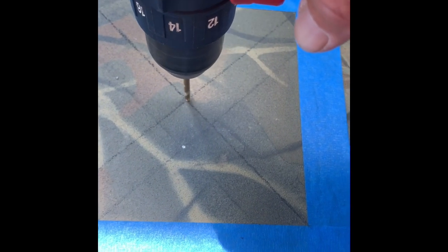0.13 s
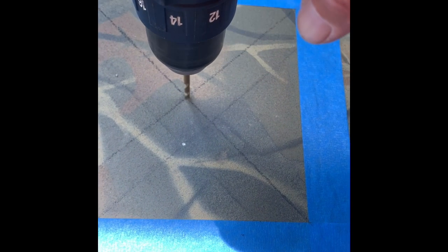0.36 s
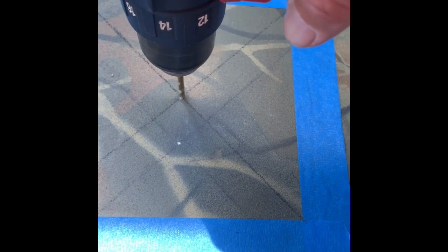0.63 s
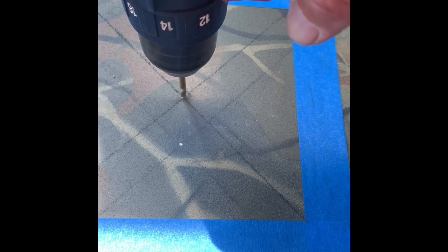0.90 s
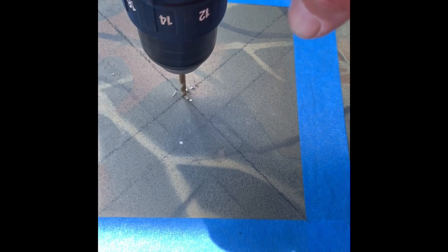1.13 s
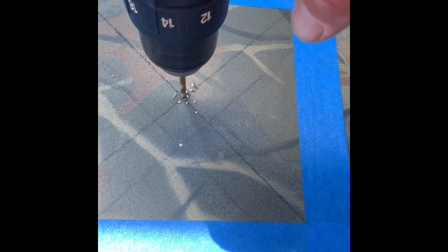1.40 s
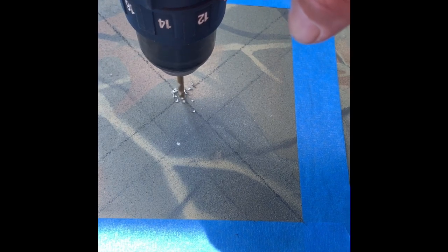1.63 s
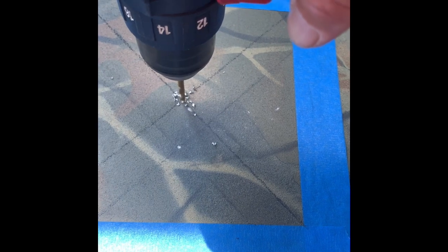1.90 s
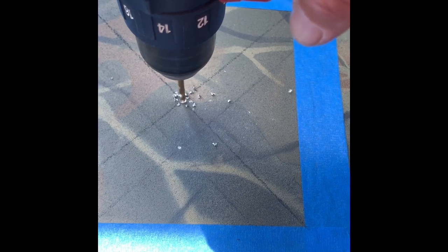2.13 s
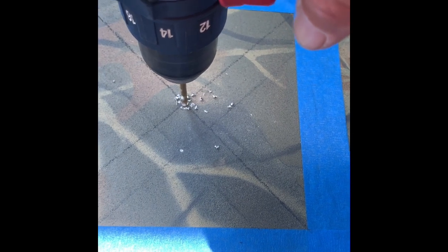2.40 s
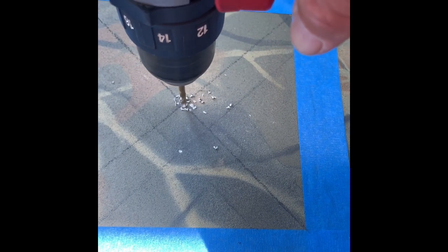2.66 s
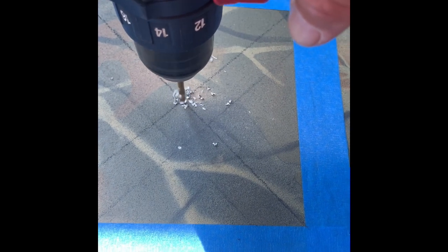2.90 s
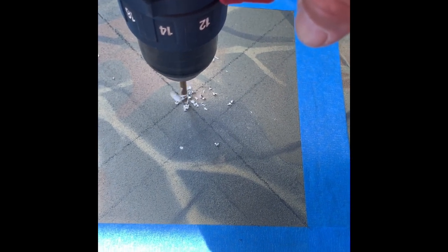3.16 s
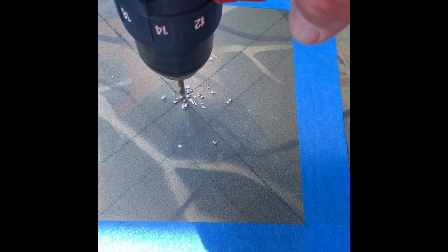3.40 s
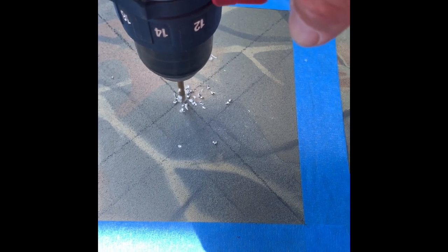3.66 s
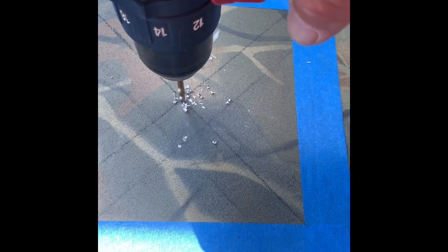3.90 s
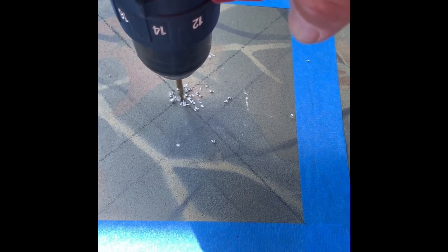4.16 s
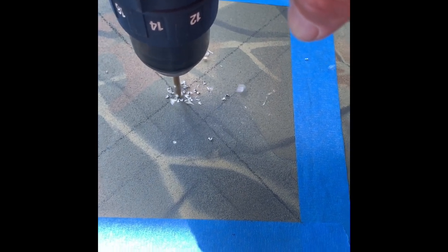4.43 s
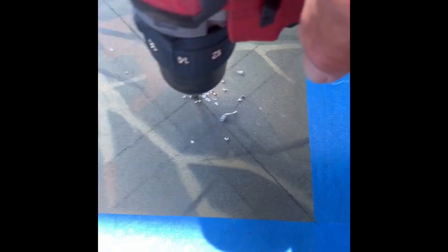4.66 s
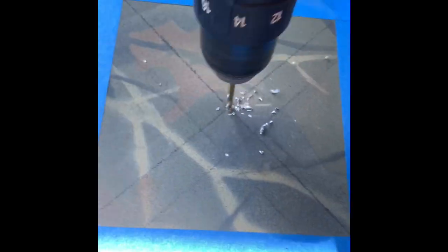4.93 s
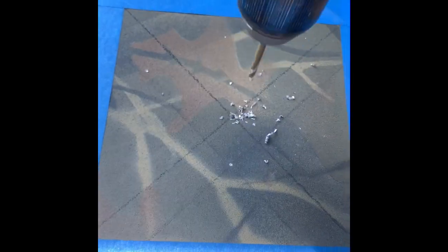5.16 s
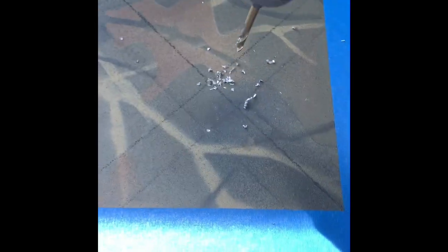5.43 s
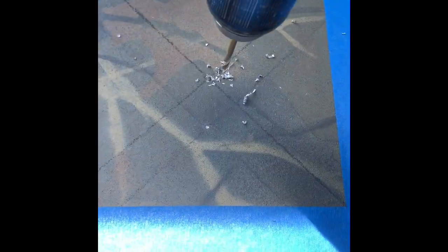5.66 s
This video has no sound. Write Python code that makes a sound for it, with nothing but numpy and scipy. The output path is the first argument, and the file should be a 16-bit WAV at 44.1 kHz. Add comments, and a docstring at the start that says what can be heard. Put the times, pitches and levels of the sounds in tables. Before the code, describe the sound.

Close outdoor drilling of a metal deck: whistling motor whirr, gritty steady cut, thud and high whine on breakthrough, abrupt stop, then only wind.

```python
"""A slow drill whirr in a light wind runs up in two steps, cuts a small hole in an aluminium deck,
races as the bit breaks through and brakes with a shriek and knocks to a stop, leaving wind and hush.
Motor and gears are near sines locked to a modelled speed; chopped current whistles in mirrored pairs.
Deck, grind, housing and fan are shaped noises; knocks are decaying tones behind noisy cracks.
Wind is lumpy low noise at a close pair of microphone ports, over a faint open-air hush."""
import sys
import numpy as np
from scipy import signal
from scipy.fft import rfft, irfft, next_fast_len
from scipy.io import wavfile

SR = 44100
rng = np.random.default_rng(int(sys.argv[2]) if len(sys.argv) > 2 else 0)


def to_wav(s):
    """Save 16-bit WAV."""
    ch = np.atleast_2d(s).T  # columns
    pcm = np.round(np.clip(ch, -1, 1) * 32767)  # PCM
    wavfile.write(sys.argv[1], SR, pcm.astype(np.int16))


N = 255780
HZ = np.arange(N // 2 + 1) * SR / N + 1  # bin frequencies, kept off zero for the log

# Motor speed, as commutation rate: (start [s], goal [Hz], time constant [s], goal drift [Hz/s])
SPEED_STAGES = [(0, 283, .05, 0), (.066, 592, .048, 0), (.14, 600.5, .075, -8), (.999, 910, 0.044, 0),
                (1.061, 916, 0.08, -0.5), (1.8, 913, .06, -15), (2.45, 897.5, 0.063, -13),
                (3.3, 887, .05, 22), (3.541, 882, 0.031, 0), (3.64, 890, .05, -28),
                (4.446, 1054, .022, 21.5), (4.592, 1059, .03, 3999.5), (4.69, 1520, .032, 0),
                (4.796, 1450, .04, -600), (5.02, 1240, .03, -2500)]
STOP_S = 5.085
# Starts of creep, start, free, spin-up, cut, deep cut, tear, race, crest, ease, brake: (time [s])
STATE_STARTS_S = [0, .075, .13, 1.03, 1.075, 3.77, 4.485, 4.6, 4.705, 4.82, 5.02]
STATE_FADE_S = .025

# Tone orders are multiples of the commutation rate.
CHOPPER_HZ = 9879
MESH_ORDER = 3.25
# Whistles one commutation rate below and above the chopper, one row each: (level per state [dB])
WHISTLE_STATES_DB = [(-26, -23, -21.5, -28, -28, -29, -40, -48, -50, -42, -50),
                     (-39, -29, -24, -22, -19.5, -18.5, -22, -32, -25, -26, -50)]
# Faint whistles: (offset from chopper [orders], slow level [dB], fast level [dB])
FAINT_WHISTLES_DB = [(-2, -43, -41), (-.5, -52, -48), (0, -42, -46), (.5, -41, -37), (2, -41, -52)]
# Gear mesh, 4th, 5th, 2nd, double mesh: (order [1])
GEAR_TONE_ORDERS = [MESH_ORDER, 4, 5, 2, 2 * MESH_ORDER]
# One row per gear tone: (level per state [dB])
GEAR_STATES_DB = [(-55, -52, -40, -34, -26.5, -27, -38, -19, -17, -19, -28),
                  (-55, -40, -30, -44, -27, -38, -33, -33, -30, -26, -45),
                  (-55, -50, -31, -48, -33, -34, -42, -45, -45, -50, -50),
                  (-50, -50, -40, -48, -48, -48, -44, -22, -36, -30, -40),
                  (-50, -50, -39, -45, -37, -34, -47, -27, -24, -24, -45)]
# Faint gear tones: (order [1], slow level [dB], fast level [dB])
FAINT_GEARS_DB = [(.84, -48, -60), (2.81, -37, -52), (3, -37, -40), (5.62, -55, -41), (8, -41, -55)]
SLOW_HZ, FAST_HZ = 600, 880  # commutation rates for the slow and fast levels
# Gear case response: (frequency [Hz], gain [dB])
CASE_RESPONSE = [(1000, -6), (2000, -2), (2300, 0), (2500, -4), (2750, 2), (2880, 3.5), (2975, .5),
                 (3090, -10), (3250, -5), (3420, -14), (3530, -2), (3700, -3), (4200, 1), (4950, 3),
                 (5350, 2), (5750, -1), (6000, -8), (8500, -6), (9000, -3), (9800, 0)]
# Whine while the bit tears out the last of the hole: (time [s], level [dB])
TEAR_WHINE_DB = [(4.44, -50), (4.49, -30), (4.52, -21.5), (4.56, -26), (4.59, -56)]
TEAR_ORDER = 5.68
FAINT_FADE_S = 4.58  # the faint whistles and faint gear tones drop from here on

# Noise colours: (frequency [Hz], relative density [dB per Hz])
DECK_COLOUR = [(350, -13), (500, -8.5), (620, -10), (880, -5.5), (1000, -4), (1120, 0.5), (1200, -1),
               (1350, -11), (1900, -41.5), (2600, -21.5)]
GRIND_COLOUR = [(900, -41.5), (1400, 5.5), (1620, 4.5), (1850, -4), (2300, 3), (2700, -2), (3200, -3.5),
                (3800, 7), (4500, 1.5), (5300, 1.5), (5900, 3), (7400, -0.5), (8000, -18)]
HOUSING_COLOUR = [(7200, -34), (7800, -5.5), (8200, 2.5), (8700, -4), (9300, -10.5), (10500, -6)]
FAN_COLOUR = [(500, -21.5), (2000, -1.5), (7000, -13), (9500, -4.5), (11500, -2.5), (13500, 0),
              (15850, -3.5)]
# Deck rumble, gear grind, housing ring, fan, one row each: (level per state [dB])
ROAR_STATES_DB = [(-41.5, -38.5, -35, -31.5, -27.5, -28, -23, -22, -22, -20.5, -25),
                  (-42.5, -36.5, -35, -32, -30.5, -30.5, -26.5, -26.5, -27.5, -30, -25),
                  (-51, -42, -32, -32, -25, -26.5, -23, -21.5, -20.5, -20.5, -29),
                  (-31.5, -28.5, -30, -23.5, -25, -25, -22, -20.5, -21.5, -21.5, -22)]
# Level change with pressure on the bit: (time [s], change [dB])
PRESSURE_DB = [(1.0, 0.5), (1.15, -0.5), (1.4, 1.5), (1.75, -1), (2.5, .5), (3.6, -.5), (4.0, 1),
               (4.4, 0.5), (4.6, -1), (4.78, 1), (5.0, -1.5), (5.07, 4)]
# Noise dying unevenly as the shaft locks: (time [s], gain [dB])
RUN_DOWN_DB = [(5.073, 0), (5.08, -9), (5.088, -1), (5.098, -8), (5.107, -1.5), (5.114, -20), (5.126, -34),
               (5.14, -35), (5.2, -54)]
# Mid-band hiss steps up and down: period, a crest, change each way
MID_HISS_STEP_S, MID_HISS_STEP_PEAK_S, MID_HISS_STEP_DB = 1.237, 1.46, 2.0
CHUCK_TURNS_PER_COMMUTATION = 1 / 40

# Brake shriek; its frequency is taken at the loudest moment
SHRIEK_S, SHRIEK_DB, SHRIEK_RISE_S, SHRIEK_END_S = 5.069, -9, .006, .0034
SHRIEK_HZ, SHRIEK_FALL_HZ_PER_S = 1970, 23000
# Knocks of gears, bit and brake: (time [s], ring level [dB], pitch [Hz], 60 dB decay [s], crack level [dB])
KNOCK_EVENTS = [(.1164, -18, 8300, .02, -38.5), (4.573, -2, 216, 0.096, -43), (4.575, -5, 504, 0.06, -40),
                (4.599, -3.5, 199, 0.092, -40), (5.092, -28, 1200, .03, -21.5),
                (5.1064, -22.5, 4400, .06, -18), (5.1452, -30, 1700, 0.011, -44.5),
                (5.108, -47, 9910, 0.3, -61.5), (5.1195, -42, 8000, .06, -42.5)]

# Wind noise colours: (frequency [Hz], relative density [dB per Hz])
BUFFET_COLOUR = [(20, -13), (40, 0.5), (70, 0), (120, -3.5), (170, -10), (260, -36)]
FLUTTER_COLOUR = [(90, -15.5), (150, -3.5), (200, -2), (300, -8.5), (450, -13.5), (700, -33), (1200, -44)]
# Breeze: (time [s], buffeting level [dB], flutter level [dB])
BREEZE_DB = [(0, -26, -35.5), (.45, -29, -39.5), (.85, -30.5, -41.5), (1.3, -33, -31.5), (2.1, -25, -25.5),
             (2.7, -30, -32.5), (3.2, -29, -35.5), (4.0, -31, -34.5), (4.5, -27.5, -32), (4.75, -22, -22),
             (5.05, -21.5, -29), (5.2, -26.5, -39), (5.62, -22.5, -44), (5.8, -36, -50)]
# Gusts over the breeze: (time [s], width [s], buffeting change [dB], flutter change [dB])
GUST_EVENTS = [(.16, .03, 0.5, 1), (.4, 0.023, 4, 3), (.29, 0.022, -2, 6), (.5, .03, 3, 5),
               (1.06, 0.018, 0, 12.5), (1.2, 0.039, 8.5, -2.5), (1.66, 0.027, 12.5, 5.5),
               (1.97, 0.03, 7, -3), (2.05, 0.0087, 7, 8), (2.359, 0.077, 2, 2.5), (2.84, .04, 5, 2),
               (3.341, 0.022, 0, 11), (3.45, 0.035, 9.5, 15), (3.51, 0.033, 8, 11.5), (3.93, 0.021, 5, 7),
               (4.2, 0.057, 7.5, 2.5), (4.35, .03, 9, 5.5), (4.47, 0.017, 9.5, 4), (4.6, 0.031, 0, 10.5),
               (4.66, 0.034, 6.5, 1.5), (4.95, 0.034, 1.5, 5.5), (5.35, 0.097, 1.5, 10),
               (5.47, 0.012, -5, 6), (5.57, .015, 1, 13.5), (5.75, .025, 6, 19)]
# Open-air hush colour: (frequency [Hz], relative density [dB per Hz])
OUTDOORS_COLOUR = [(300, -8), (550, -9), (800, -1), (1100, -2), (1400, -7), (2000, -12), (3100, -17),
                   (3800, -14), (4500, -18), (5800, -20), (7000, -25), (10500, -32), (12000, -42),
                   (15000, -46)]
OUTDOORS_DB, HUSH_DIFFUSE_DB = -53.5, -50  # hush through the stereo pattern, hush free of it

# Stereo pattern by frequency, nearly one channel around 8 kHz:
# (frequency [Hz], left minus right phase [rad], likeness [0-1], left minus right level [dB])
STEREO_PATTERN = [(50, 0, .97, 0), (130, 0, .83, 0), (300, -.2, .82, 0), (500, -.4, .8, -2),
                  (750, 0, .85, -3), (1100, .25, .9, 0), (1400, 0, .99, 0), (2000, 0, .97, 0),
                  (2450, 1.2, .3, -3), (2900, .55, .75, 2), (3400, 1.2, .4, -2), (3900, 1.8, .6, 1),
                  (4400, 2.3, .6, .5), (4850, 3.0, .93, 0), (5150, 3.35, .9, 0), (5500, 3.9, .75, 0),
                  (6800, 5.2, .75, 0), (7300, 6.1, .96, 0), (8700, 6.35, .99, 0), (9500, 7.0, .75, 0),
                  (10800, 8.4, .8, 0), (11400, 9.2, .97, 0), (12500, 9.6, .96, 0), (13500, 10.3, .78, 0),
                  (15000, 11.9, .78, 0), (15300, 12.55, .99, 0)]
# Drill places, each moving the stereo pattern in pitch: (time [s], pattern pitch factor [1])
DRILL_PLACES = [(0, 1), (4.68, 1.055), (4.82, .97), (5.02, 1)]
MOVE_S = .04
TOP_HZ = 16250


def from_db(db):
    """Decibels to gain."""
    return 10 ** (np.asarray(db) / 20)


def in_time(rows):
    """Columns of a table at every sample."""
    s, *columns = np.transpose(rows)
    return [np.interp(np.arange(N) / SR, s, c) for c in columns]


def by_state(levels_db):
    """A level that holds through each running state and fades to the next."""
    edges_s = np.add.outer(STATE_STARTS_S[1:], [-STATE_FADE_S / 2, STATE_FADE_S / 2]).ravel()
    return np.interp(np.arange(N) / SR, edges_s, np.repeat(levels_db, 2)[1:-1])


def drift(rate_hz):
    """Slow chance of spread 1: white noise through two equal poles, at a 20th of the sample rate."""
    r = np.exp(-40 * np.pi * rate_hz / SR)
    white = rng.standard_normal(N // 20 + 2002)
    slow = signal.lfilter([1], [1, -2 * r, r * r], white)[2000:]
    return np.interp(np.arange(N) / 20, np.arange(len(slow)), slow / slow.std())


def coloured(colour, low_hz, high_hz, grain_db=0.):
    """Two unrelated noises of one colour; rms 1 between the given edges."""
    hz, db = np.transpose(colour)
    grain = from_db(grain_db * rng.standard_normal(N))
    white = rng.standard_normal((2, N)) * grain
    shaped = rfft(white) * from_db(np.interp(np.log(HZ), np.log(hz), db, left=-70, right=-70))
    band = (HZ > low_hz) & (HZ < high_hz)
    power = np.sum(abs(shaped[:, band]) ** 2) / N ** 2
    return irfft(shaped / np.sqrt(power), N)


def drill():
    """Tones plus deck, grind, housing and fan; the contact noises throb once per chuck turn."""
    t = np.arange(N) / SR
    (press_db,), (stop_db,) = in_time(PRESSURE_DB), in_time(RUN_DOWN_DB)
    deck_db, grind_db, housing_db, fan_db = [by_state(db) + stop_db for db in ROAR_STATES_DB]
    cutting = (t > STATE_STARTS_S[4]) & (t < STATE_STARTS_S[6])
    wave = np.cos(2 * np.pi * (t - MID_HISS_STEP_PEAK_S) / MID_HISS_STEP_S)
    hiss_step_db = cutting * MID_HISS_STEP_DB * np.tanh(3.0 * wave)
    tones, turn = motor_tones()
    throb = np.sin(turn * CHUCK_TURNS_PER_COMMUTATION)

    deck_db = deck_db + press_db + 1.0 * throb + 0.66 * drift(10.5)
    grind_db = grind_db + 0.13 * press_db + hiss_step_db + 0.21 * throb + 1.0 * drift(13.0)
    housing_db = housing_db + .9 * press_db + 0.5 * throb + 0.4 * drift(37)
    fan_db = fan_db + 0.36 * drift(20.0)

    deck = from_db(deck_db) * coloured(DECK_COLOUR, 794, 1380)
    grind = from_db(grind_db) * coloured(GRIND_COLOUR, 6117, 7340, grain_db=1.5)
    housing = from_db(housing_db) * coloured(HOUSING_COLOUR, 7800, 9550)
    fan = from_db(fan_db) * coloured(FAN_COLOUR, 11400, 16700, grain_db=0.5)
    return deck + grind + housing + fan + tones * [[1], [.12]]  # tones mostly in the shared part


def motor_tones():
    """Near sines: gear orders on the shaft speed, whistles mirrored about the chopper tone."""
    speed_hz, t = motor_speed(), np.arange(N) / SR
    turn = 2 * np.pi * np.cumsum(speed_hz * (1 + .0012 * drift(6) + .0015 * drift(60))) / SR
    chop = 2 * np.pi * np.cumsum(CHOPPER_HZ + 5.0 * drift(10) + 7.0 * drift(80)) / SR
    case_hz, case_db = np.transpose(CASE_RESPONSE)

    # each tone: (phase [rad], level [dB])
    tones = [(chop + k * turn, by_state(db)) for k, db in zip([-1, 1], WHISTLE_STATES_DB)]
    for k, db in zip(GEAR_TONE_ORDERS, GEAR_STATES_DB):
        tones.append((k * turn, by_state(db) + np.interp(k * speed_hz, case_hz, case_db)))
    tear_db = np.interp(t, *np.transpose(TEAR_WHINE_DB), left=-90, right=-90)
    tones.append((TEAR_ORDER * turn, tear_db))

    fast = np.clip((speed_hz - SLOW_HZ) / (FAST_HZ - SLOW_HZ), 0, 1)
    creep_db = np.clip((speed_hz - SLOW_HZ + 100) / 8, -30, 0)  # faint gears sink while the shaft creeps
    fade_db = -14.0 * (t > FAINT_FADE_S)
    for k, slow_db, fast_db in FAINT_WHISTLES_DB:
        tones.append((chop + k * turn, fade_db + slow_db + fast * (fast_db - slow_db)))
    for k, slow_db, fast_db in FAINT_GEARS_DB:
        tones.append((k * turn, fade_db + creep_db + slow_db + fast * (fast_db - slow_db)))

    out = np.zeros(N)
    for phase, db in tones:
        unsteady_db = db + 1.2 * drift(25) + .6 * drift(3)
        out += np.sqrt(2) * from_db(unsteady_db) * np.sin(phase)  # levels are rms
    return out * (t < STOP_S), turn


def motor_speed():
    """Commutation rate [Hz]: in each stage it closes exponentially on a drifting goal."""
    t, speed_hz, now_hz = np.arange(N) / SR, np.zeros(N), SPEED_STAGES[0][1]
    ends_s = [row[0] for row in SPEED_STAGES[1:]] + [STOP_S]
    for (start, goal_hz, lag_s, drift_hz_per_s), end in zip(SPEED_STAGES, ends_s):
        since = np.clip(t - start, 0, end - start)
        stage_hz = goal_hz + drift_hz_per_s * since + (now_hz - goal_hz) * np.exp(-since / lag_s)
        speed_hz = np.where(t >= start, stage_hz, speed_hz)
        now_hz = stage_hz[-1]
    return speed_hz


def shriek():
    """Brake shriek: a short falling tone that swells, then cuts off faster."""
    t = np.arange(N) / SR - SHRIEK_S
    shape = np.exp(-(t / np.where(t < 0, SHRIEK_RISE_S, SHRIEK_END_S)) ** 2)
    cycles = SHRIEK_HZ * t - SHRIEK_FALL_HZ_PER_S * t * t / 2
    tone = from_db(SHRIEK_DB) * shape * np.sin(2 * np.pi * cycles)
    return np.array([tone, 0 * tone])


def knocks():
    """Each knock rings one pitch behind a short noisy crack."""
    out = np.zeros((2, N))
    for s, db, hz, t60_s, crack_db in KNOCK_EVENTS:
        start = round(s * SR)
        t = np.arange(min(N - start, SR // 2)) / SR
        swell = 1 - np.exp(-t * hz)  # time constant of one cycle
        ring = from_db(db - 60 * t / t60_s) * swell * np.sin(2 * np.pi * hz * t)
        crack = from_db(crack_db - 60 * t / 0.017) * rng.standard_normal((2, len(t)))
        out[0, start:start + len(t)] += ring
        out[:, start:start + len(t)] += crack
    return out


def wind():
    """Lumpy low noise at the ports: a breeze with bell-shaped gusts."""
    buffet_db, flutter_db = in_time(BREEZE_DB)
    t = np.arange(N) / SR
    for s, width_s, low_db, high_db in GUST_EVENTS:
        bell = np.exp(-((t - s) / width_s) ** 2)
        buffet_db, flutter_db = buffet_db + low_db * bell, flutter_db + high_db * bell
    buffet = from_db(buffet_db + 1.17 * drift(12)) * coloured(BUFFET_COLOUR, 32, 128)
    flutter = from_db(flutter_db + 3.2 * drift(30)) * coloured(FLUTTER_COLOUR, 140, 420)
    return buffet + flutter


def outdoors(level_db):
    """Faint open-air hush: broad noise with a slightly wavering level."""
    return from_db(level_db + 1.1 * drift(13)) * coloured(OUTDOORS_COLOUR, 500, 15000)


def stereo(pair, shift):
    """Sets phase, likeness and tilt by frequency; the first signal is shared, the second is not."""
    hz, phase_rad, likeness, tilt_db = np.transpose(STEREO_PATTERN)
    hz = hz * shift
    size = next_fast_len(N + SR // 10)
    bins_hz = np.arange(size // 2 + 1) * SR / size
    alike = np.clip(np.interp(bins_hz, hz, likeness), 0, 1)
    # half of the phase and tilt goes to each channel
    half = np.exp(.5j * np.interp(bins_hz, hz, phase_rad)) * from_db(np.interp(bins_hz, hz, tilt_db) / 2)
    shared, own = rfft(pair, size) * np.sqrt([(1 + alike) / 2, (1 - alike) / 2])
    return irfft([(shared + own) * half, (shared - own) / half], size)[:, :N]


def scene():
    """Drill, knocks, shriek, wind and some hush meet the ports; diffuse hush is added after."""
    near = drill() + knocks() + shriek() + wind() + outdoors(OUTDOORS_DB)
    t = np.arange(N) / SR
    # the stereo pattern crossfades as the drill changes place
    arrived = [np.ones(N)]
    arrived += [np.clip((t - s) / MOVE_S, 0, 1) for s, _ in DRILL_PLACES[1:]]
    arrived += [np.zeros(N)]
    heard = np.zeros((2, N))
    for (_, shift), come, gone in zip(DRILL_PLACES, arrived, arrived[1:]):
        heard += stereo(near * (come - gone), shift)
    return heard + outdoors(HUSH_DIFFUSE_DB)


def low_pass(x):
    """Removes everything above the highest recorded frequency."""
    return signal.sosfilt(signal.butter(12, 16820, fs=SR, output="sos"), x)


def record(dry):
    """Peaks are rounded softly, then the top is cut."""
    rounded = 1.28 * np.tanh(dry / 1.331)
    top_cut = signal.cheby2(24, 60, TOP_HZ, fs=SR, output="sos")
    return low_pass(signal.sosfilt(top_cut, rounded))


dry = scene()
out = record(dry)
to_wav(out)
```